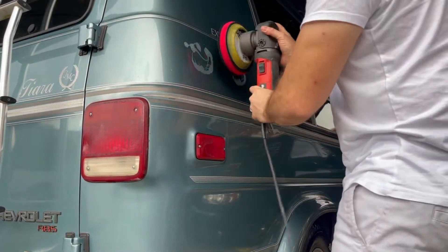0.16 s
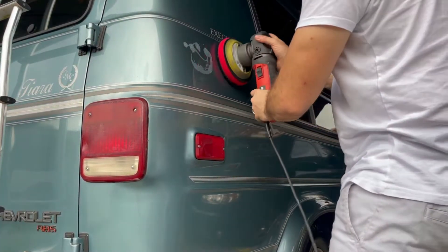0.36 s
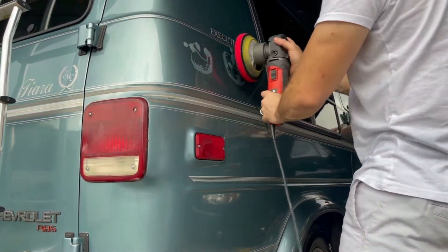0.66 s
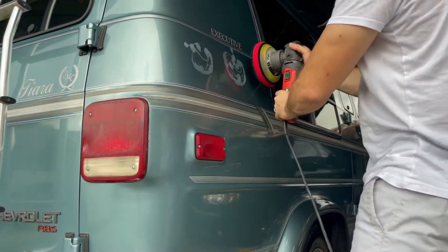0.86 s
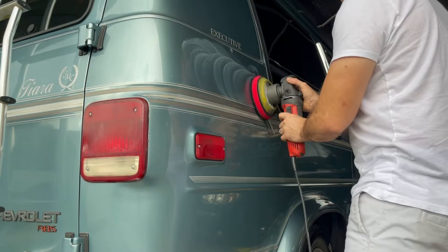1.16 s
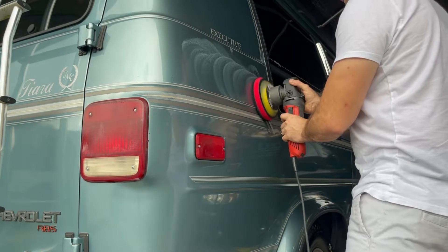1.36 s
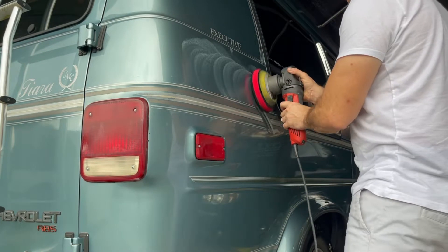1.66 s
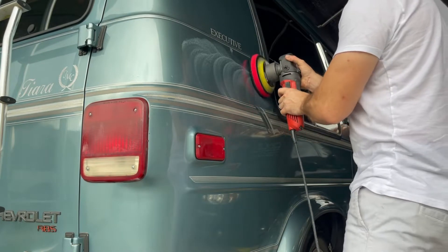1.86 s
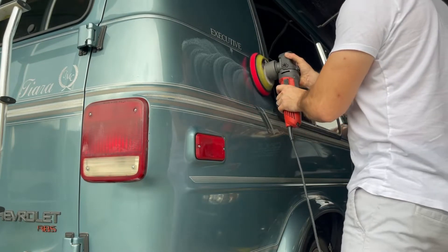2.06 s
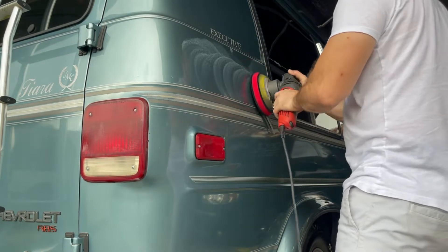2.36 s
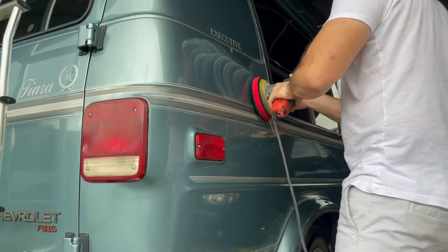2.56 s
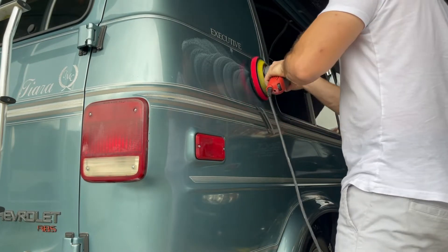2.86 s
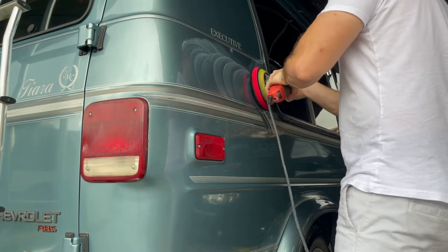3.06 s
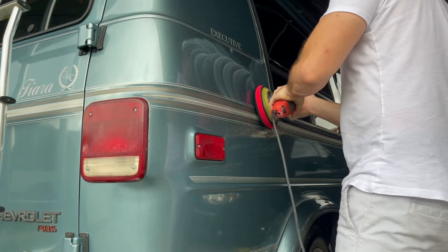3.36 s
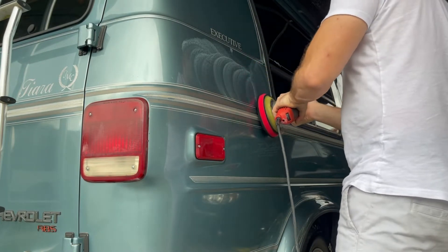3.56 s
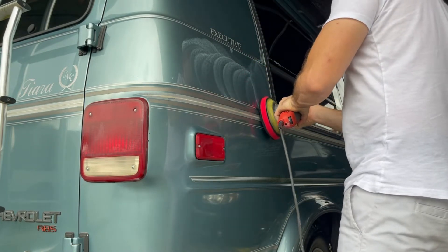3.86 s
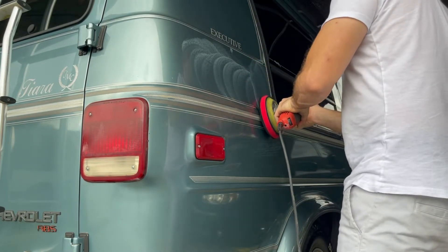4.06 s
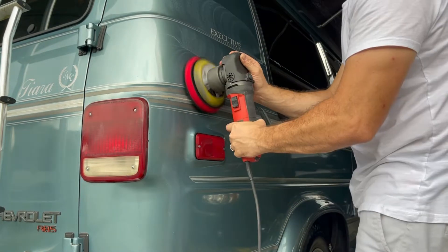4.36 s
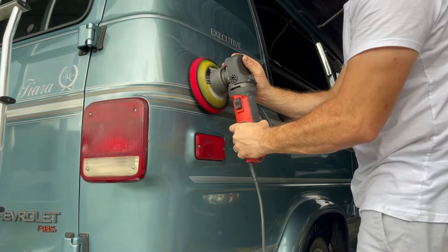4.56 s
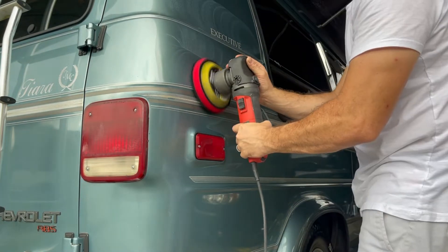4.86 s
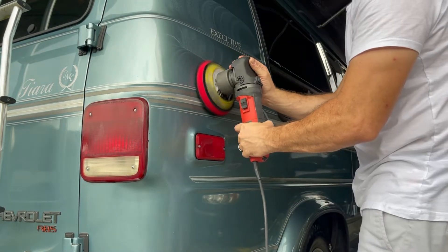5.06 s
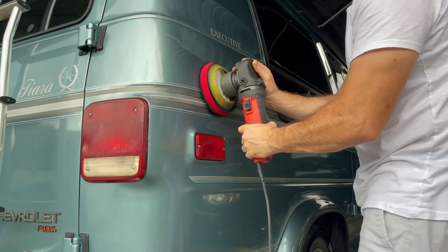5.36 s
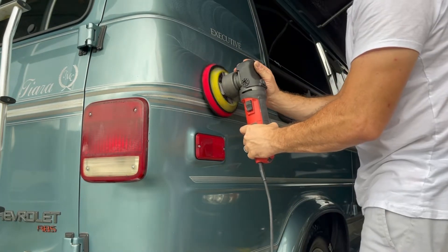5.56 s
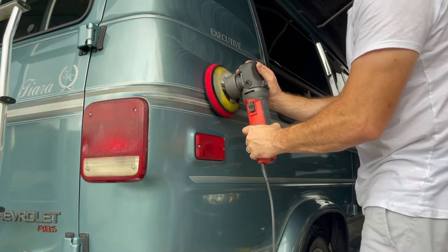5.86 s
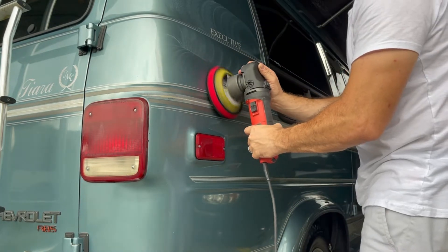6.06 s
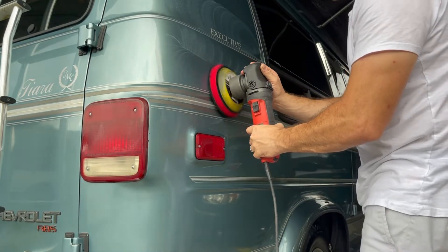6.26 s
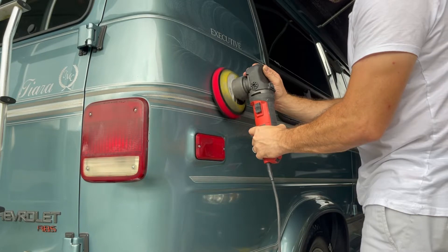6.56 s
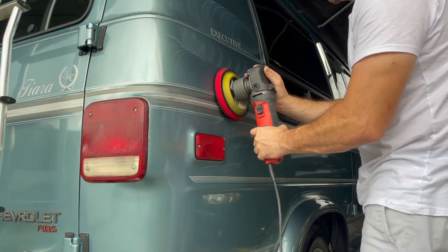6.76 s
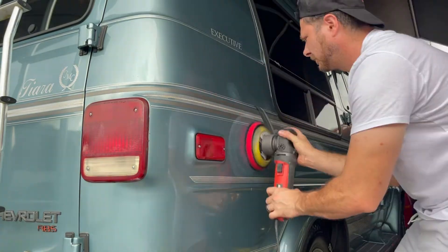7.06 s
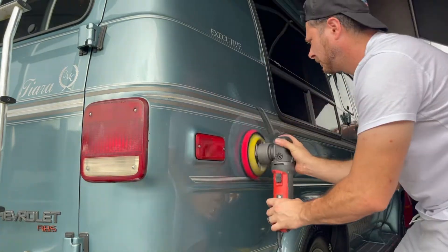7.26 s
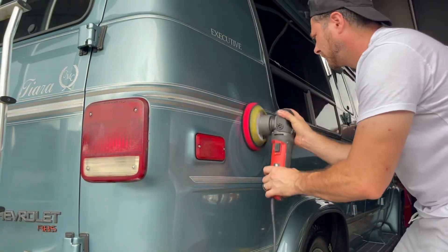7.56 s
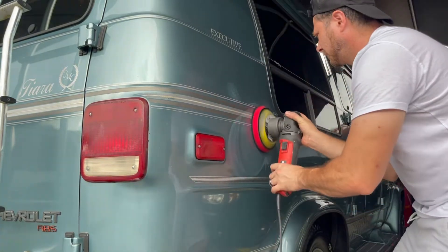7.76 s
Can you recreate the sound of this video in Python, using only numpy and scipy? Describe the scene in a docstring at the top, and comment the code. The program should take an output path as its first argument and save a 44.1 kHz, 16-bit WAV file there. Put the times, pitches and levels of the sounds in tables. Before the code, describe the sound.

Close stereo microphone beside a vehicle, with little room echo. A dull, quiet polisher pass with faint moaning and tiny trim ticks cuts suddenly to a bright electric whine over grainy rubbing and fan hiss, swaying as the tool moves. Another hard cut brings a higher, fuller whir with a throbbing low hum. The final cut is loudest: a rising whine, booming panel and stuttering howls that ease slightly.

```python
"""At the side of a van, an orbiting polisher works its foam pad over the panel in four passes, cut close together.
One motor speed drives each pass: the commutator whines, the gears sing and the off-centre pad thumps the panel.
Rubbing and fan air are coloured noise that pulses with the orbit, the shaft and the mains.
The first pass is soft and muffled, with a moan and a few ticks on the trim; the last speeds up and howls."""
import sys
import numpy as np
from scipy import signal
from scipy.fft import irfft
from scipy.io import wavfile
from scipy.ndimage import uniform_filter1d

SR = 44100
rng = np.random.default_rng(int(sys.argv[2]) if len(sys.argv) > 2 else 0)


def log_audio(samples):
    """Write samples as a 16-bit WAV file to the path given in sys.argv[1]."""
    # one column per channel
    frames = np.atleast_2d(samples).T
    # limit to full scale, then quantise
    limited = np.clip(frames, -1, 1)
    pcm = np.round(limited * 32767).astype(np.int16)
    wavfile.write(sys.argv[1], SR, pcm)


N = 348390
T, HZ = np.arange(N) / SR, np.fft.rfftfreq(N, 1 / SR)
# commutator bars, shaft turns per pad orbit, mains frequency
BARS, GEAR_RATIO, MAINS_HZ = 30, 17 / 3, 60


def amp(db):
    """Decibels to a plain factor."""
    return 10 ** (np.asarray(db) / 20)


def evened(x):
    """The same signal at unit average size."""
    return x / np.sqrt(np.mean(abs(x) ** 2) + 1e-20)


def read(points, column=1):
    """One column of a spectrum table at every frequency."""
    rows = np.array(points, float)
    return np.interp(np.log(HZ + 1), np.log(rows[:, 0] + 1), rows[:, column])


def follow(rows):
    """The columns of a curve table at every sample."""
    s, *columns = np.transpose(rows)
    return [np.interp(T, s, c) for c in columns]


def wander(hz):
    """Complex chance of unit size, changing up to about hz times a second."""
    count = N // 32
    f = np.fft.fftfreq(count, 32 / SR)
    spectrum = np.exp(2j * np.pi * rng.random(count)) / np.sqrt(1 + (f / hz) ** 4)
    slow = np.fft.ifft(spectrum)
    return np.interp(T, np.linspace(0, T[-1], count), evened(slow))


def swell(s, half_s):
    """A bell-shaped rise and fall around s."""
    return np.exp(-((T - s) / half_s) ** 2)


def turning(turns_per_s):
    """Angle in radians of something that turns at the given speed."""
    return 2 * np.pi * np.cumsum(turns_per_s) / SR


def colour(x, gain):
    """Filters x with a short, centred response that has the given gain at every frequency."""
    coarse = np.fft.rfftfreq(4096, 1 / SR)
    taps = np.fft.fftshift(irfft(np.interp(coarse, HZ, gain)))
    return signal.oaconvolve(x, taps[1:], "same")


def band(white, gain):
    """Two-channel noise of unit size in the given colour."""
    return evened(np.array([colour(side, gain) for side in white]))


# how the microphone's two ports differ at each pitch: pitch_hz, left_lead_radians, likeness (0-1), left_minus_right_db
PORT_DIFFERENCES = [(50, .08, .995, .5), (400, 0, .96, .2), (1000, .1, .9, 1.2), (1600, -.15, .84, .3),
                    (2100, .1, .85, .8), (2900, .9, .84, 2), (4200, .52, .82, 2), (5100, .6, .78, 3.1),
                    (6400, .15, .82, 2.5), (7100, .5, .62, 5), (7600, .75, .77, 1.6), (8500, 0, .96, .3),
                    (9000, -.88, .93, .7), (9900, -2.65, .93, .1), (10580, -3.72, .93, -.3),
                    (12000, -5.6, .4, -1)]


def ports(x):
    """Sound from the tool reaches the two ports with its own lead and balance at each pitch."""
    half = np.exp(.5j * read(PORT_DIFFERENCES, column=1)) * amp(read(PORT_DIFFERENCES, column=3) / 2)
    return np.array([colour(x, half), colour(x, 1 / half)])


def air():
    """White noise at both ports: a shared direct part and a part scattered by the surroundings."""
    same = np.clip(read(PORT_DIFFERENCES, column=2), 0, 1)
    direct, scattered = rng.standard_normal((2, N))
    shared = ports(colour(direct, np.sqrt((1 + same) / 2)))
    apart = ports(colour(scattered, np.sqrt((1 - same) / 2)))
    return shared + apart * [[1], [-1]]


# resonances and dips of the gap between tool and panel that come and go as the tool moves:
# middle_s, half_length_s, pitch_hz, glide_hz_per_s, width_hz, level_db
GAP_RESONANCES = [(0.336, 0.077, 1235, -2.5, 59, 13), (0.746, 0.045, 711, -400, 59.4, 12),
                  (0.828, 0.045, 5600, -5, 3000, -8), (1.956, .28, 3010, 5.5, 510, 4.5),
                  (2.312, .17, 5830, -200, 382, 3), (2.83, 0.42, 5250, 0, 702, -9),
                  (3.202, 0.18, 5540, -4, 645, 8), (4.25, 0.53, 2620, 4, 310, 2.5),
                  (4.7, .5, 3550, -15, 158, 5), (4.9, 0.082, 5200, 594, 251, 5.5),
                  (5.594, 1.7, 6180, 128.5, 259, 3.5), (6.394, .6, 3120, 101.5, 200, 4),
                  (6.55, 0.48, 2530, 1, 496, -1.5), (7.1, .07, 5470, 996, 138.5, 7),
                  (7.18, .035, 1265, 3, 150, 1.5), (7.29, 0.056, 3880, 703, 330, 3.5),
                  (7.288, 0.018, 1380, 1, 160, 2.5), (7.392, .025, 1265, 0, 150, 5),
                  (7.836, .12, 3105, 8.5, 136, 12.5)]


def shifting(white, patchy_db, patch_s, patch_hz):
    """Reflections off the panel recolour the noise: passing resonances and dips, and a slow random ripple."""
    hz, s, z = signal.stft(white, SR, nperseg=2048, noverlap=1536)
    hz = hz[:, None]
    db = 0
    for middle_s, half_s, centre, glide, width, level_db in GAP_RESONANCES:
        away_s = s - middle_s
        away_hz = hz - centre - glide * away_s
        db = db + level_db * np.exp(-(away_s / half_s) ** 2 - 2 * (away_hz / width) ** 2)
    # random values smoothed over both pitch and time
    across, along = np.fft.fftfreq(len(hz), hz[1, 0])[:, None], np.fft.fftfreq(len(s), s[1])
    smooth = np.exp(-(across * patch_hz) ** 2 - (along * patch_s) ** 2)
    ripple = evened(np.fft.ifft2(np.fft.fft2(rng.standard_normal(db.shape)) * smooth).real)
    return signal.istft(z * amp(db + patchy_db * ripple), SR, nperseg=2048, noverlap=1536)[1][:, :N]


# the hand eases off or leans in, and stays so for the rest of that pass: start_s, takes_s, pressure_change_db
HAND_LEANS = [(.48, 0.34, -5), (2.15, 0.42, -1), (3.0, 0.14, 1.5), (7.39, 0.077, -6.5), (7.78, 0.076, -3)]


def pressure(start):
    """Pressure on the pad in dB, against that at the start of the pass."""
    return sum(db * np.clip((T - s) / takes, 0, 1) for s, takes, db in HAND_LEANS if s >= start)


# swells and lulls in the panel's booming: middle_s, half_length_s, thump_change_db, octave_change_db
PANEL_BOOMS = [(0.35, 0.15, 13, 1), (0.8, 0.05, 4, 3), (7.327, 0.18, 13, -4.5), (7.418, 0.13, -2.5, 12.5),
               (7.622, 0.057, 1, -17)]


def work(start, thump_db, octave_db, rub_db, hiss_db, thump_per_db=1, octave_per_db=1, hiss_per_db=1):
    """Levels of thump, octave, rubbing and hiss: all change with the pressure, and the panel booms in swells."""
    load = pressure(start)
    thumping = thump_db + thump_per_db * load
    octave = octave_db + octave_per_db * load
    for s, half_s, thump_change_db, octave_change_db in PANEL_BOOMS:
        thumping = thumping + thump_change_db * swell(s, half_s)
        octave = octave + octave_change_db * swell(s, half_s)
    return thumping, octave, rub_db + load, hiss_db + hiss_per_db * load


def settle(start, from_hz, to_hz, lag_s):
    """Commutator pitch of a motor that closes in on its set speed."""
    return to_hz + (from_hz - to_hz) * np.exp(-np.maximum(T - start, 0) / lag_s)


def whine(shaft, orbit, level_db, flutter, flutter_hz, wobble, fuzz):
    """The commutator's note; each orbit bends and swells it, and the brushes roughen it."""
    rough = 1 + flutter * wander(flutter_hz) + fuzz * wander(300)
    swing = 1 + wobble * (wander(0.42) * np.sin(orbit) + .5 * wander(1) * np.sin(2 * orbit))
    return amp(level_db) * evened((rough * swing * np.exp(1j * BARS * shaft)).real)


def beam(rows):
    """Level of the whine: it is beamed narrowly, so it sways with every small move of the tool."""
    sway_db, sway_hz = .7, 9
    return follow(rows)[0] + sway_db * wander(sway_hz).real


def gears(shaft, tones, rough=0.23):
    """Gears and fan sing at multiples of the shaft speed, each wavering on its own."""
    waver = wander(7.3)
    lines = 0
    for multiple, db in tones:
        own_waver = 1 + rough * np.roll(waver, rng.integers(N))
        lines = lines + amp(db) * (own_waver * np.exp(1j * multiple * shaft)).real
    return np.sqrt(2 / (1 + rough ** 2)) * lines


# upper harmonics of the pad's orbit: multiple_of_orbit, level_db (against the octave)
THUMP_HARMONICS = [(3, -17.5), (4, -29.5), (5, -35.5)]


def thump(orbit, first_db, second_db, unsteady):
    """The off-centre pad shakes the panel once an orbit; a light touch makes the shaking uneven."""
    upper = np.cos(2 * orbit)
    for multiple, db in THUMP_HARMONICS:
        upper = upper + amp(db) * np.cos(multiple * orbit + 2 * np.pi * rng.random())
    first = (np.exp(1j * orbit) * (1 + unsteady * wander(6.4))).real
    upper = upper * (1 + unsteady * wander(10.0).real)
    return np.sqrt(2 / (1 + unsteady ** 2)) * (amp(first_db) * first + amp(second_db) * upper)


def rushing(white, grips, body):
    """Rubbing and air hiss, their colour drifting as the tool is turned and pressed."""
    ringing_db = sum(db * np.exp(-2 * ((HZ - hz) / width) ** 2) for hz, width, db in body)
    # rubbing gives way to hiss between 4000 and 4400 Hz
    treble = np.clip((HZ - 4000) / 400, 0, 1)
    ends = 1 / np.sqrt((1 + (130 / (HZ + 1)) ** 8) * (1 + (HZ / 8900) ** 44))
    times, rub, hiss = [s for s, _ in grips], 0, 0
    for weights, (_, spectrum) in zip(np.eye(len(grips)), grips):
        shape = ends * amp(read(spectrum) + ringing_db)
        share = np.interp(T, times, weights)
        rub = rub + share * band(white, shape * (1 - treble))
        hiss = hiss + share * band(white, shape * treble)
    return rub, hiss


# low rumble of the panel under the pad: pitch_hz, level_db (per Hz)
PANEL_RUMBLE = [(15, -27), (40, 3), (75, 10.5), (140, 1), (260, -11), (600, -44)]
# hiss that peaks near 9 kHz: pitch_hz, level_db (per Hz)
TOP_HISS = [(7000, -33), (8200, -73.5), (8900, 14), (9600, 11.5), (10200, 13), (11200, 0.5),
            (12200, -21.5), (13000, -61.5)]


def polish(white, whine_hz, whine_db, levels, grips, body, tones, top_hiss_db, rumble_db, orbit_depth,
           shaft_depth, spark_depth, unsteady, flutter, flutter_hz, wobble, fuzz, grain_db):
    """One pass: whine, gears, thump and pulsing noise, all locked to the motor's turning."""
    first_db, second_db, rub_db, hiss_db = levels
    shaft = turning(whine_hz / BARS)
    orbit = shaft / GEAR_RATIO
    # the brushes spark at both crests of the mains wave
    sparks = np.sin(2 * np.pi * MAINS_HZ * T) ** 6
    grain = amp(grain_db * wander(190).real)
    orbit_pulse = 1 + orbit_depth * np.cos(orbit)
    shaft_pulse = 1 + shaft_depth * np.cos(shaft)
    rub_pulse = evened(orbit_pulse * shaft_pulse * (1 + .9 * spark_depth * sparks) * grain)
    # the fan air pulses once and twice a turn
    fan_pulse = 1 + 0.06 * np.cos(shaft) + .1 * np.cos(2 * shaft)
    hiss_pulse = evened((1 + spark_depth * sparks) * fan_pulse * grain)
    rub, hiss = rushing(white, grips, body)
    # the same noise a second later, so it is unlike the rubbing
    other_white = np.roll(white, SR, axis=1)
    top_hiss = amp(top_hiss_db) * band(other_white, amp(read(TOP_HISS)))
    rumble = amp(rumble_db) * band(other_white, amp(read(PANEL_RUMBLE)))
    # below this the rubbing is a steady wash; above it, it rasps with the turning
    rasp_hz = 1510
    wash = np.array([colour(side, 1 / (1 + (HZ / rasp_hz) ** 8)) for side in rub])
    rubbing = amp(rub_db) * (wash + rub_pulse * (rub - wash) + rumble)
    hissing = amp(hiss_db) * hiss_pulse * (hiss + top_hiss)
    tonal = whine(shaft, orbit, whine_db, flutter, flutter_hz, wobble, fuzz)
    tonal = tonal + thump(orbit, first_db, second_db, unsteady)
    singing = amp(rub_db) * rub_pulse * gears(shaft, tones)
    return rubbing + hissing + ports(tonal + singing)


# the moan wavers and sags: time_s, pitch_hz, level_db
MOAN_CURVE = [(0, 1014, -46), (.2, 1012, -58), (.38, 986, -50), (.5, 946, -56), (.67, 914, -53),
              (.76, 912, -70), (.83, 1072, -64), (.91, 1078, -66)]
# the tones it is made of: multiple_of_pitch, level_db
MOAN_TONES = [(.7, -18), (1, -1), (1.2, -10), (1.5, -7), (2, -14)]


def moan(rough, rough_hz):
    """A soft, muffled moan: a main tone, one below and three above it, each wavering on its own."""
    pitch_hz, level_db = follow(MOAN_CURVE)
    phase = turning(pitch_hz)
    tone = 0
    for multiple, db in MOAN_TONES:
        waver = 1 + rough * wander(rough_hz)
        tone = tone + amp(db) * evened((waver * np.exp(1j * multiple * phase)).real)
    return ports(amp(level_db) * tone)


# level of the whine: time_s, level_db
SOFT_WHINE = [(0, -66), (.92, -74)]
# colour of rubbing and air: pitch_hz, level_db (per Hz)
SOFT_RUSH = [(150.0, 5), (300.0, -3.5), (500.0, -8), (750.0, -7.5), (1100.0, -8), (1400.0, -13),
             (1800.0, -12.5), (2300.0, -20), (2900.0, -25.5), (3600.0, -30), (4500.0, -29), (5600.0, -31),
             (7000.0, -36), (8300.0, -27.5)]
# peaks and dips of housing and panel on top of that colour: pitch_hz, width_hz, level_db
SOFT_BODY = [(150, 110, -4), (427, 78, -6), (1030, 140, 5.5), (1420, 120, 7), (5040, 110, 3)]
# gear and fan tones: multiple_of_shaft, level_db (against the rubbing)
SOFT_TONES = [(1, -21), (15, -32)]


def soft_pass(white, start):
    """A light, muffled pass with uneven thumps and a moan, while the motor settles."""
    levels = work(start, thump_db=-50.0, octave_db=-51.5, rub_db=-43.0, hiss_db=-63.0,
                  thump_per_db=1.0, octave_per_db=-0.5, hiss_per_db=0.5)
    sound = polish(white, settle(start, from_hz=9710, to_hz=10000, lag_s=1.0), follow(SOFT_WHINE)[0],
                   levels, [(0, SOFT_RUSH)], SOFT_BODY, SOFT_TONES,
                   top_hiss_db=4.0, rumble_db=1.5, orbit_depth=0.046, shaft_depth=.05, spark_depth=0.28,
                   unsteady=0.84, flutter=.4, flutter_hz=60, wobble=.2, fuzz=.4, grain_db=-1.5)
    return sound + moan(rough=.65, rough_hz=14)


# the pad's edge ticks on the trim: start_s, level_db, scrape_s, dull_above_hz
TRIM_TICKS = [(0.3755, -45, 0.0076, 4500), (0.4113, -38, 0.0034, 8500), (0.453, -37.5, 0.0025, 10500),
              (0.462, -48, .0028, 9500), (0.6025, -52, 0.0021, 3500), (.6165, -56, .0012, 10000),
              (0.6458, -49, .002, 7500)]
# what the trim rings with: pitch_hz, level_db, time_to_fall_60_db_s
TRIM_RINGS = [(2740, 1, .01), (3020, 0, 0.009), (3670, 0, .006), (5260, -0.5, .007), (6000, -3, .004),
              (8750, 5, 0.0044)]


def ticks(scrape_db):
    """Short scratchy blows ring the trim, each with its own scrape length and dullness."""
    t, out = np.arange(3000) / SR, np.zeros(N)
    ring = sum(amp(db - 60 * t / t60) * np.sin(2 * np.pi * hz * t) for hz, db, t60 in TRIM_RINGS)
    for s, db, scrape_s, dull_hz in TRIM_TICKS:
        scratch = rng.standard_normal(len(t)) * np.exp(-t / scrape_s)
        tick = evened(np.convolve(scratch, ring)[:len(t)]) + amp(scrape_db) * evened(scratch)
        dulling = signal.butter(2, [1200, np.clip(dull_hz, 2000, 15000)], "band", fs=SR)
        tick = signal.lfilter(*dulling, tick)
        # the level is that of the whole tick's energy packed into 5 ms
        out[round(s * SR):][:len(t)] += amp(db) * tick / np.sqrt(np.sum(tick ** 2) / (.005 * SR))
    return ports(out)


def drone(turn_hz, spots, rough):
    """Single multiples of a turning rate swell and fade, all with the same waver."""
    turn = turning(turn_hz)
    waver = 1 + rough * wander(5.6)
    tones = 0
    for s, half_s, multiple, db in spots:
        tone = evened((waver * np.exp(1j * multiple * turn)).real)
        tones = tones + amp(db) * swell(s, half_s) * tone
    return ports(tones)


# spots of the panel that drone as the pad crosses them: middle_s, half_length_s, multiple_of_orbit, level_db
PANEL_DRONES = [(1.65, 0.34, 5, -57), (2.1, .2, 3, -58), (2.72, 0.13, 5, -57.5), (3.02, 0.088, 5, -58),
                (3.22, .22, 4, -51.5), (3.25, 0.11, 6, -57), (3.76, 0.081, 6, -55), (3.8, 0.51, 5, -60.5)]


def panel_drone(shaft_hz):
    """Spots of the panel drone at multiples of the pad's orbit."""
    return drone(shaft_hz / GEAR_RATIO, PANEL_DRONES, rough=.25)


# rubbing in time with orbit less pad spin: middle_s, half_length_s, multiple_of_difference, level_db
PAD_RUBS = [(2.3, .5, 2, -55), (3.2, 0.29, 2, -50), (3.6, .25, 2, -48.5), (3.55, .15, 4, -52.5),
            (4.0, .15, 4, -57)]


def pad_rub(shaft_hz):
    """The free pad spins slowly against its orbit and rubs the panel in time with the difference."""
    pad_spin_hz = 6.3
    return drone(shaft_hz / GEAR_RATIO - pad_spin_hz, PAD_RUBS, rough=.25)


# tones that stand out in the slow and fast passes: middle_s, half_length_s, multiple_of_shaft, level_db
GEAR_SINGS = [(2.4, 0.22, 6, -56), (2.3, 0.16, 18, -68), (2.35, .22, 19, -53), (4.482, 0.17, 7, -46),
              (5.003, 0.69, 6, -46.5), (5.75, 0.6, 5, -49), (6.15, 0.32, 7, -49), (6.68, 0.49, 6, -47)]


def gear_singing(shaft_hz, rough):
    """Gear and fan tones stand out while the tool faces the right way."""
    return drone(shaft_hz, GEAR_SINGS, rough)


# the motor hunts about its set speed: time_s, commutator_pitch_hz
SLOW_SPEED = [(0.95, 9006), (1.6, 9020), (2.0, 9022), (2.22, 8996), (2.4, 8997), (2.53, 8981), (2.75, 8997),
              (2.95, 9036), (3.15, 8986), (3.35, 8968), (3.75, 9006), (3.99, 9003), (4.12, 9038)]
# level of the whine as the tool is moved and turned: time_s, level_db
SLOW_WHINE = [(0.95, -23), (1.46, -22.5), (1.66, -28.5), (1.77, -25.5), (1.99, -27.5), (2.1, -24),
              (2.55, -29.5), (2.64, -35.5), (2.9, -31.5), (2.98, -37.5), (3.15, -23.5), (3.26, -27.5),
              (3.37, -22), (3.68, -22.5), (3.94, -19.5), (4.1, -23.5)]
# colour of rubbing and air at first, then turned flat, then lowered: pitch_hz, level_db (per Hz)
SLOW_RUSH = [(150.0, -6), (300.0, -7.5), (500.0, -10), (750.0, -1.5), (1100.0, -1.5), (1400.0, -3),
             (1800.0, -8), (2300.0, -6), (2900.0, -4.5), (3600.0, -8), (4500.0, -14.5), (5600.0, -11.5),
             (7000.0, -18), (8300.0, -13)]
TURNED_RUSH = [(150.0, -7), (300.0, -13.5), (500.0, -10), (750.0, -7), (1100.0, 1), (1400.0, 0.5),
               (1800.0, -7), (2300.0, -7), (2900.0, -10), (3600.0, -10), (4500.0, -16), (5600.0, -7),
               (7000.0, -25), (8300.0, -7.5)]
LOWERED_RUSH = [(150.0, -13), (300.0, -12), (500.0, -12.5), (750.0, -6), (1100.0, -4), (1400.0, -6.5),
                (1800.0, -8), (2300.0, -9), (2900.0, -9.5), (3600.0, -11.5), (4500.0, -7.5), (5600.0, -5.5),
                (7000.0, -7), (8300.0, -7)]
# peaks and dips of housing and panel: pitch_hz, width_hz, level_db
SLOW_BODY = [(436, 220, -4), (678, 185, 3.5), (1180, 130, -4), (2435, 120, -6), (5200, 680, 3.5),
             (6180, 260, 2)]
# gear and fan tones: multiple_of_shaft, level_db (against the rubbing)
SLOW_TONES = [(1, -26.5), (6, -18), (7, -19.5), (10, -21), (12, -18.5), (13, -24.5)]


def slow_pass(white, start):
    """The lowest motor speed, with droning spots, singing gears and slower rubs from the pad's spin."""
    whine_hz = follow(SLOW_SPEED)[0]
    shaft_hz = whine_hz / BARS
    levels = work(start, thump_db=-46.5, octave_db=-54.0, rub_db=-37.0, hiss_db=-41.0,
                  thump_per_db=1.5, octave_per_db=2.0, hiss_per_db=-1.1)
    grips = [(2.1, SLOW_RUSH), (2.75, TURNED_RUSH), (3.3, LOWERED_RUSH)]
    sound = polish(white, whine_hz, beam(SLOW_WHINE), levels, grips, SLOW_BODY, SLOW_TONES,
                   top_hiss_db=-34.0, rumble_db=-17, orbit_depth=0.025, shaft_depth=0.032, spark_depth=0.26,
                   unsteady=0.3, flutter=0.22, flutter_hz=58.5, wobble=0.14, fuzz=0.015, grain_db=1.7)
    return sound + panel_drone(shaft_hz) + gear_singing(shaft_hz, rough=.3) + pad_rub(shaft_hz)


# the motor creeps up to its set speed: time_s, commutator_pitch_hz
FAST_SPEED = [(4.2, 10542), (4.72, 10575), (6.9, 10599)]
# level of the whine as the tool is moved and turned: time_s, level_db
FAST_WHINE = [(4.15, -23.5), (4.67, -26), (4.91, -39), (5.14, -26), (5.29, -35), (5.62, -29), (5.81, -34.5),
              (5.93, -23.5), (6.98, -29.5)]
# colour of rubbing and air at first, then with the grip settled: pitch_hz, level_db (per Hz)
FAST_RUSH = [(150.0, -26.5), (300.0, -15.5), (500.0, -12), (750.0, -8.5), (1100.0, 2), (1400.0, -4),
             (1800.0, -4), (2300.0, -1.5), (2900.0, -7), (3600.0, -13.5), (4500.0, -6.5), (5600.0, -8),
             (7000.0, -10.5), (8300.0, -0.5)]
SETTLED_RUSH = [(150.0, -18), (300.0, -4.5), (500.0, -5), (750.0, 0.5), (1100.0, 7.5), (1400.0, 1),
                (1800.0, 5), (2300.0, 6.5), (2900.0, 3), (3600.0, -3), (4500.0, 0), (5600.0, -1),
                (7000.0, -3), (8300.0, 6.5)]
# peaks and dips of housing and panel: pitch_hz, width_hz, level_db
FAST_BODY = [(247, 20, 3.5), (690, 160, 2.5), (1137, 188, -8.5), (1640, 60, -8.5), (2050, 345, -5.5),
             (4330, 280, 0), (4730, 150, -7), (7700, 650, -3.5)]
# gear and fan tones: multiple_of_shaft, level_db (against the rubbing)
FAST_TONES = [(1, -20.5), (2, -16.5), (3, -24), (4, -22.5), (5, -19.5), (6, -26.5), (7, -17.5)]


def fast_pass(white, start):
    """The highest motor speed, with steady thumps and singing gears."""
    whine_hz = follow(FAST_SPEED)[0]
    levels = work(start, thump_db=-34.0, octave_db=-52.0, rub_db=-31.5, hiss_db=-36.0)
    grips = [(4.4, FAST_RUSH), (5.4, SETTLED_RUSH)]
    sound = polish(white, whine_hz, beam(FAST_WHINE), levels, grips, FAST_BODY, FAST_TONES,
                   top_hiss_db=2.0, rumble_db=-21.5, orbit_depth=0.063, shaft_depth=0.13, spark_depth=0.2,
                   unsteady=0.04, flutter=0.3, flutter_hz=60, wobble=0.35, fuzz=0.25, grain_db=1.7)
    return sound + gear_singing(whine_hz / BARS, rough=.5)


# the howl catches and drops out as the pad tilts; pressed hard it chatters:
# start_s, length_s, level_db, chatter (0-1)
HOWL_BURSTS = [(7.084, 0.032, -37, .6), (7.129, 0.075, -30, 0.35), (7.22, .035, -35, 1),
               (7.306, 0.091, -30.5, 0.9), (7.406, 0.12, -36.5, 0.85), (7.549, 0.17, -39.5, 0.65),
               (7.792, .12, -40, 0.2)]
# each orbit swells and bends the howl, which adds side tones: offset_in_orbits, level_db
HOWL_SIDE_TONES = [(1, -3), (-1, -11), (3, -15)]


def howl(whine_hz, rough):
    """As the motor speeds up, the sixth multiple of the shaft meets a housing resonance and howls in bursts."""
    shaft = turning(whine_hz / BARS)
    shudder = rough * wander(45)
    for offset, db in HOWL_SIDE_TONES:
        shudder = shudder + amp(db) * np.exp(1j * offset * shaft / GEAR_RATIO)
    edge_s = 0.015
    bursts = 0
    for s, length, db, chatter in HOWL_BURSTS:
        gate = np.clip(.5 + np.minimum(T - s, s + length - T) / edge_s, 0, 1)
        bursts = bursts + amp(db) * gate * (1 + chatter * shudder)
    return np.sqrt(2) * ports((bursts * np.exp(6j * shaft)).real)


# level of the whine as the tool is moved and turned: time_s, level_db
RISING_WHINE = [(7.06, -18), (7.14, -21), (7.16, -32), (7.215, -18.5), (7.245, -24), (7.335, -14.5),
                (7.365, -23.5), (7.395, -16), (7.44, -16.5), (7.47, -19.5), (7.685, -22.5), (7.73, -14.5),
                (7.81, -16.5), (7.89, -23.5)]
# colour of rubbing and air at first, then eased off: pitch_hz, level_db (per Hz)
RISING_RUSH = [(150.0, -4), (300.0, -4), (500.0, -5), (750.0, -12), (1100.0, 3), (1400.0, -1), (1800.0, 0),
               (2300.0, -1.5), (2900.0, -3.5), (3600.0, -4.5), (4500.0, -5), (5600.0, -6.5),
               (7000.0, -10.5), (8300.0, -3)]
EASED_RUSH = [(150.0, -8), (300.0, -6.5), (500.0, -4.5), (750.0, -10), (1100.0, 1), (1400.0, 0.5),
              (1800.0, -2), (2300.0, -3.5), (2900.0, -4), (3600.0, -4.5), (4500.0, -8.5), (5600.0, -8.5),
              (7000.0, -12), (8300.0, -4.5)]
# peaks and dips of housing and panel: pitch_hz, width_hz, level_db
RISING_BODY = [(755, 140, 13.5), (1020, 36, -5), (1160, 220, 0.5), (1620, 130, -3.5), (1940, 190, 5),
               (2350, 250, -3), (6300, 420, 0)]
# gear and fan tones: multiple_of_shaft, level_db (against the rubbing)
RISING_TONES = [(1, -17), (7, -19.5), (10, -21), (12, -17), (13, -20), (18, -30)]


def rising_pass(white, start):
    """The motor speeds up towards its set speed and the howl comes in bursts."""
    whine_hz = settle(start, from_hz=8900, to_hz=10190, lag_s=.59)
    levels = work(start, thump_db=-40.5, octave_db=-31, rub_db=-26.5, hiss_db=-34.0,
                  thump_per_db=0.25, octave_per_db=1.35, hiss_per_db=0.7)
    grips = [(7.38, RISING_RUSH), (7.5, EASED_RUSH)]
    sound = polish(white, whine_hz, beam(RISING_WHINE), levels, grips, RISING_BODY, RISING_TONES,
                   top_hiss_db=-21, rumble_db=-19, orbit_depth=0.03, shaft_depth=0.064, spark_depth=0.55,
                   unsteady=0.072, flutter=0.33, flutter_hz=55, wobble=0.11, fuzz=0.025, grain_db=1.5)
    return sound + howl(whine_hz, rough=.25)


# where each pass starts, and a last value past the end of the sound: start_s
PASS_STARTS = [0, .9155, 4.129, 7.029, 8]


def scene():
    """The four passes, each giving way to the next within a millisecond or two, and the ticks."""
    white = shifting(air(), patchy_db=1.52, patch_s=0.34, patch_hz=200)
    out = ticks(scrape_db=-7)
    players = [soft_pass, slow_pass, fast_pass, rising_pass]
    for play, start, end in zip(players, PASS_STARTS, PASS_STARTS[1:]):
        window = uniform_filter1d(1. * ((T >= start) & (T < end)), size=48)
        out = out + window * play(white, start)
    return out


def record(dry):
    """A steep filter takes away everything well above 12200 Hz."""
    low_pass = signal.firwin(255, 12200, window=("kaiser", 9), fs=SR)
    return signal.oaconvolve(dry, low_pass[None], "same")


dry = scene()
out = record(dry)
log_audio(out)
```